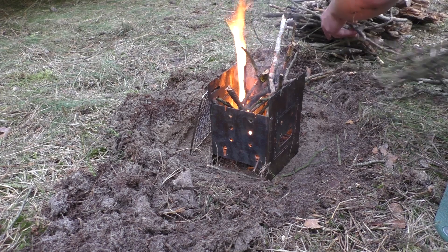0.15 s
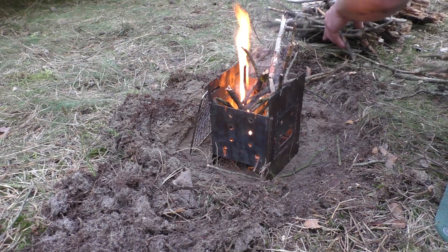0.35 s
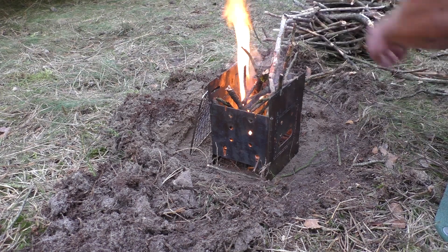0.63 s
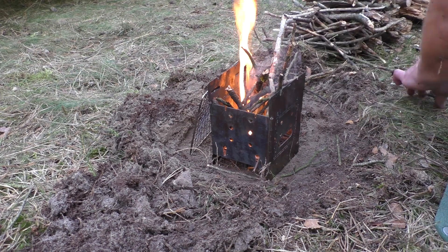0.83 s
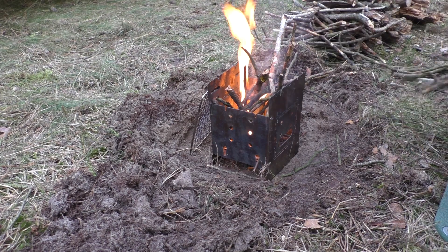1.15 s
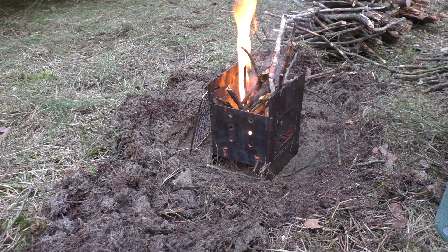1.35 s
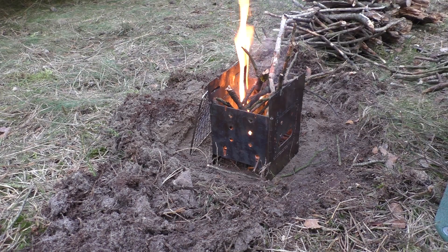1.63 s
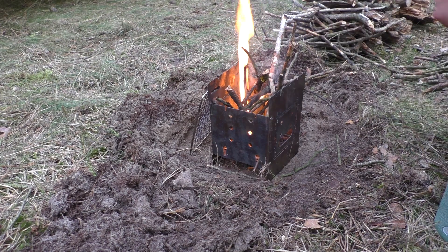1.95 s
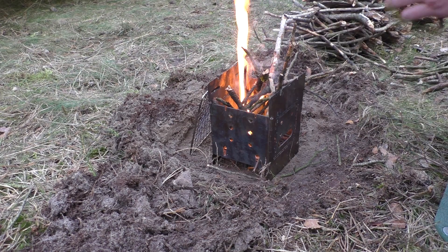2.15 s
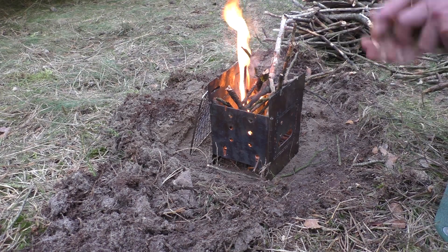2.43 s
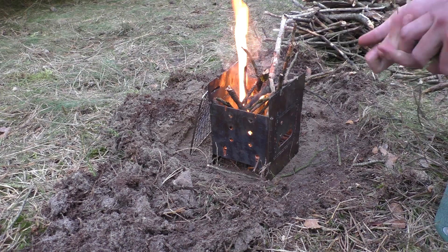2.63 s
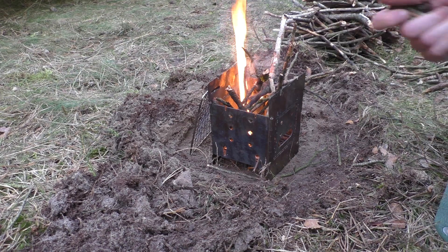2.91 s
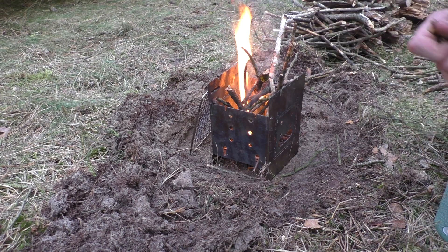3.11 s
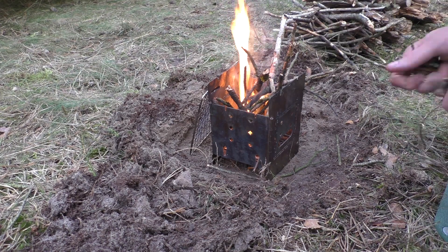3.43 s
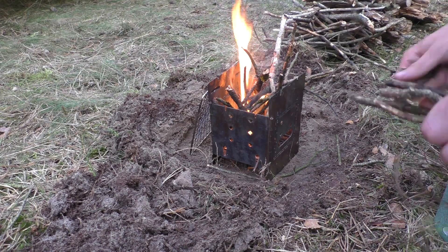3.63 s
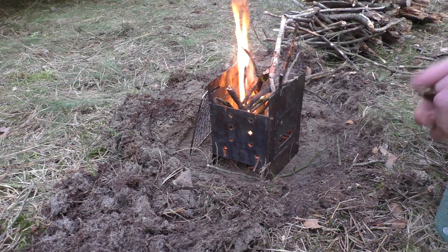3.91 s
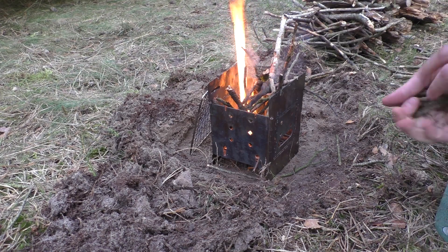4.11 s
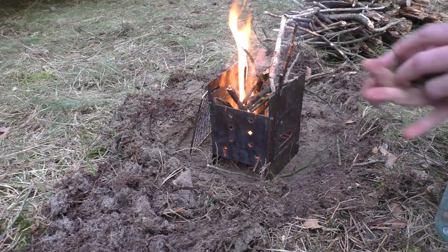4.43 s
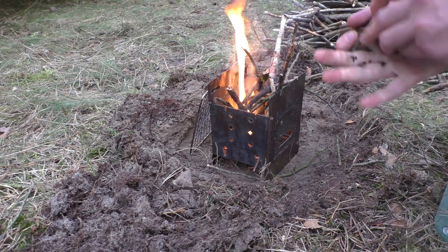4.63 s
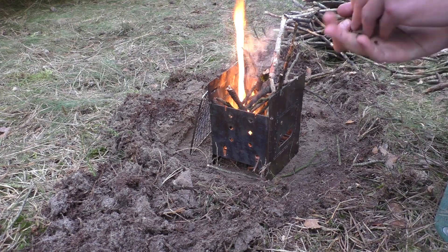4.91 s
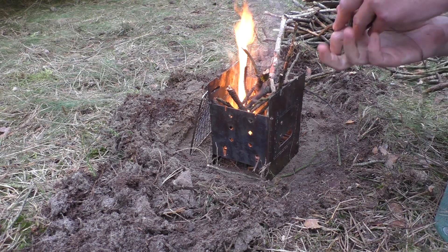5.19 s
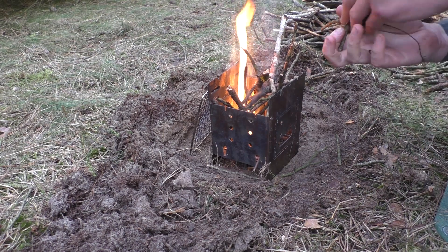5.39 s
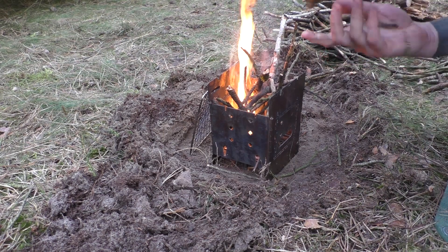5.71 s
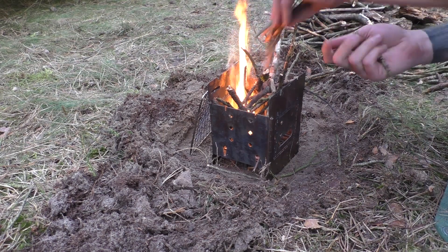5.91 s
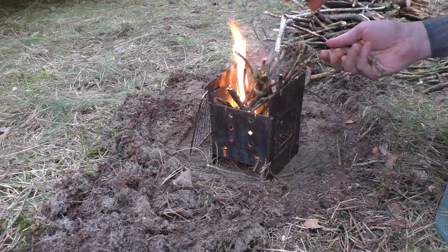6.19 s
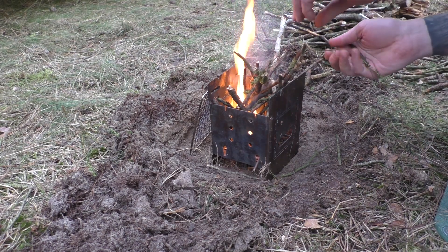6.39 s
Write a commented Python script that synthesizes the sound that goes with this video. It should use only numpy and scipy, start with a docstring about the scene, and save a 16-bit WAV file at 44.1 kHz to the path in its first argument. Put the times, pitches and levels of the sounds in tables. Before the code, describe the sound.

Close by in the open air, hands pull dry twigs from a pile, bark rasping and sticks ticking together over the faint flutter and tiny pops of a small wood fire. Twigs snap sharply, a couple first and then a quick, loud run. More rummaging follows, with one thin metallic ping. At the end the flame swells slightly and sticks knock against the ringing walls of a steel stove.

```python
"""Over open air and the low flutter of a small steel wood stove, hands pull dry twigs from a pile:
bark rasps as it sticks and slips, sticks tick together, and weight shifts softly on the soil.
From two seconds in, twigs snap close by; the loudest cracks push down the gain, which creeps back.
More rummaging follows, then one thin metallic ping. Near six seconds the flame swells
and the last sticks knock against the stove's ringing walls."""
import sys
import numpy as np
from scipy import signal
from scipy.io import wavfile
from scipy.ndimage import uniform_filter1d

SR = 44100
rng = np.random.default_rng(int(sys.argv[2]) if len(sys.argv) > 2 else 0)


def to_wav(sig):
    """Store sig (one row per channel, or 1-D mono) as 16-bit WAV at the path in sys.argv[1].

    Samples outside -1..1 are clipped; the rate is SR.
    """
    pcm = np.clip(np.atleast_2d(sig), -1, 1) * 32767
    pcm = np.round(pcm).astype(np.int16)
    wavfile.write(sys.argv[1], SR, pcm.T)  # frames by channels


N = 288844
TIME = np.arange(N) / SR
CUTOFF_HZ = 15800
# The dull, rasp and hiss zones of wood noise. Each row: low edge in Hz, high edge in Hz.
WOOD_ZONES = [(400, 1500), (1500, 6000), (6000, 17000)]


def from_db(db):
    """Decibels to gain."""
    return 10 ** (np.asarray(db) / 20)


def rms_one(x):
    """Scale to an rms of 1."""
    return x / np.sqrt(np.mean(x ** 2) + 1e-20)


def automation(rows):
    """Join breakpoints into one curve for each column after the time."""
    s, *columns = np.transpose(rows)
    return [np.interp(TIME, s, c) for c in columns]


def fade(t, t60):
    """A decay that loses 60 dB in t60 seconds."""
    return np.exp(-np.log(1000) * t / max(t60, 1e-4))


def band(x, edges_hz, kind="band", order=2):
    """Butterworth filter."""
    sos = signal.butter(order, np.clip(edges_hz, 10, .45 * SR), kind, fs=SR, output="sos")
    return signal.sosfilt(sos, x + 1e-18)


def resonate(x, hz, width_hz, db):
    """Bell EQ: lift or lower one resonance."""
    r = np.exp(-np.pi * width_hz / SR)
    feedback = [1, -(1 + r * r) * np.cos(2 * np.pi * hz / SR), r * r]
    peak = signal.lfilter(np.array([1, 0, -1]) * (1 - r * r) / 2, feedback, x)
    return x + (from_db(db) - 1) * peak


def drift(rate_hz):
    """A smooth random wobble with an rms of 1."""
    hop, run_in = 40, 2000
    r = np.exp(-2 * np.pi * hop * rate_hz / SR)
    slow = signal.lfilter([1], [1, -2 * r, r * r], rng.standard_normal(N // hop + run_in + 2))[run_in:]
    return np.interp(np.arange(N) / hop, np.arange(len(slow)), rms_one(slow))


def add(out, s, sound):
    """Mix a sound in at s seconds."""
    at = max(round(s * SR), 0)
    out[at:at + len(sound)] += sound[:max(N - at, 0)]


def turbulence(spectrum, flicker_db, rate_hz):
    """Noise in half-octave bands that each flicker on their own; rms 1."""
    out, edges = 0, 18 * 2 ** np.arange(0, 10.1, .5)
    white = rng.standard_normal((2, N))
    hz, db = np.transpose(spectrum)
    for k, (low, high) in enumerate(zip(edges, edges[1:])):
        level_db = np.interp(np.log(low * high) / 2, np.log(hz), db)
        out = out + band(white[k % 2], [low, high]) * from_db(level_db + flicker_db * drift(rate_hz))
    return rms_one(out)


def open_air(level_db=-55):
    """A faint bed of moving air: low rumble under a thin hiss."""
    # Each row: frequency in Hz, relative noise density in dB.
    air_spectrum = [(22, -1.5), (45, 2), (80, -1.5), (200, -14), (450, -19.5), (900, -19), (1600, -27.5),
                    (3000, -24.5), (6000, -34.5), (10000, -29.5), (16000, -32)]
    return from_db(level_db) * turbulence(air_spectrum, flicker_db=1.9, rate_hz=4.9)


def fire(flutter_db=0.85, pops_per_s=22, pop_db=-61, pop_t60=0.0042):
    """The flame flutters in the bass, strongest around one low pitch, while sap pops faintly."""
    # The draught, stronger as the wood catches. Each row: time in seconds, level in dB.
    draught = [(0, -55.5), (.8, -59), (1.2, -53.5), (1.7, -54.5), (2.0, -57), (2.7, -57), (3.3, -55),
               (4.1, -54.5), (4.8, -55.5), (5.6, -52), (6.1, -49.5), (6.55, -55)]
    # The flame's tone. Each row: frequency in Hz, relative noise density in dB.
    flame_spectrum = [(40, -9.5), (70, 2.5), (105, -1.5), (150, 4.5), (200, -7.5), (300, -12), (450, -18.5),
                      (900, -33), (2000, -72)]
    level_db = automation(draught)[0] + flutter_db * drift(6.5)
    roar = turbulence(flame_spectrum, flicker_db=2.0, rate_hz=19.6)
    flame = from_db(level_db) * resonate(roar, hz=153, width_hz=14.2, db=5)
    onsets = rng.random(N) < pops_per_s / SR
    sizes = from_db(5.7 * np.minimum(rng.exponential(1, N), 3))
    envelope = signal.lfilter([1], [1, -fade(1 / SR, pop_t60)], onsets * sizes + 1e-18)
    return flame + from_db(pop_db) * band(envelope * rng.standard_normal(N), [1800, 12000], order=1)


def hand_strokes(attack_s=.016, release_t60=0.16):
    """Each stroke grips, swells or eases, and lets go; gives zone levels and the spread of slip sizes."""
    # Each row: start in seconds, length in seconds, mid-stroke rasp level in dB, swell in dB,
    # dull and hiss levels in dB against the rasp, spread of slip sizes in dB.
    stroke_cues = [(0.0, 0.06, -45.5, -8.5, -7.5, -2, 3), (0.08, 0.097, -52, 4.5, -6.5, 2, 3),
                   (0.215, 0.094, -54.5, -2, -5, 0.5, 4.5), (0.392, 0.086, -59.5, 6, -7, -2.5, 3.5),
                   (0.483, 0.16, -50.5, -3, -7, -6, 4), (0.822, 0.066, -61, 0, -4, -0.5, -2),
                   (1.192, 0.056, -50, 6, -1.5, -2.5, 6), (1.33, 0.042, -59.5, 3, -1.5, -8, 1.5),
                   (1.542, 0.16, -59, 13.5, -14, -4.5, 0.5), (2.061, .03, -49, 1, 1, -6, 11),
                   (2.14, 0.16, -70.5, 2, 3, 6, 5), (2.412, 0.02, -45.5, 0, -15, -9, -1.5),
                   (2.466, 0.021, -50.5, 4.5, -11, -3, 6), (2.522, .08, -63, 1, -7, -1, 4),
                   (2.604, 0.16, -61.5, -11, -6, 0.5, 4), (2.804, 0.19, -57, -7, -9.5, 2, 4),
                   (3.06, 0.078, -49.5, 0, -30, 3.5, 7), (3.19, .03, -54, 4, -14, -1, 3.5),
                   (3.245, 0.17, -45, -1, -5, -1.5, 2), (3.362, 0.21, -47.5, 0.5, -5, 4.5, 2),
                   (3.723, 0.19, -60.5, 6.5, 3, -2, 5), (3.91, 0.16, -49.5, 1, -5, 1, 6),
                   (4.09, 0.073, -57, -6, -4, -3, 5.5), (4.17, 0.11, -68.5, 8, 1, 8, 6.5),
                   (4.28, 0.091, -55.5, 9.5, -10, 1.5, 2.5), (4.459, 0.15, -57, -0.5, -5.5, 0.5, 2.5),
                   (4.618, 0.16, -63, 0.5, -4.5, 2, 3.5), (4.834, 0.05, -59, -3, -9, 1.5, -4),
                   (4.98, .05, -63, -1, -6, -3, -2), (5.086, 0.071, -63, 7, -8, 0, 2),
                   (5.237, .11, -66.5, -3, -3, 0, 0), (6.021, 0.17, -55.5, 1, -1.5, -2, 2.5),
                   (6.07, 0.02, -48.5, 0.5, -3, 3.5, 5.5)]
    idle_db = (-71.5, -71.5, -70)   # dull, rasp and hiss of twigs shifting in the grip between strokes
    power = np.outer(from_db(idle_db) ** 2, np.ones(N))
    weighted_spread = np.zeros(N)
    for s, length, db, swell_db, dull_db, hiss_db, spread_db in stroke_cues:
        t = TIME[:int((length + release_t60) * SR)]
        pressure = from_db(db + swell_db * (np.minimum(t / length, 1) - .5))
        envelope = pressure * np.minimum(t / attack_s, 1) * fade(np.maximum(t - length, 0), release_t60)
        for zone, colour_db in zip(power, (dull_db, 0, hiss_db)):
            add(zone, s, (from_db(colour_db) * envelope) ** 2)
        add(weighted_spread, s, spread_db * envelope ** 2)
    return np.sqrt(power), weighted_spread / power[1]


def ground_echo(x):
    """The bounce off the ground shifts with the hands' height; soil and grass swallow its treble."""
    # Each row: time in seconds, delay in milliseconds, echo gain.
    echo_path = [(0, 0.33, 0.31), (2.0, 0.67, 0.089), (3.2, 1.1, 0.11), (3.35, 0.65, 0.46),
                 (3.45, 1.2, 0.15), (3.6, 2.03, 0.49), (3.8, 1.73, 0.7), (4.0, 1.96, 0.32),
                 (4.4, 0.92, 0.12), (6.55, 0.37, 0.091)]
    delay_ms, gain = automation(echo_path)
    echo = np.interp(TIME - delay_ms / 1000, TIME, x)
    return gain * band(echo, 1700, "low", order=1)


def bark_rub(slips_per_s=2600, slip_t60=0.0047, clump_db=2.5, friction=0.4, flicker_db=0.64):
    """Bark sticks and slips in clumps of tiny cracks over a smooth friction noise."""
    levels, spread_db = hand_strokes()
    sizes = from_db(spread_db * np.minimum(rng.exponential(1, N), 4) + clump_db * drift(55))
    slips = (rng.random(N) < slips_per_s / SR) * sizes ** 2
    power = signal.lfilter([1], [1, -fade(1 / SR, slip_t60) ** 2], slips) + 1e-9
    grain = np.sqrt(power / uniform_filter1d(power, size=2200) + friction ** 2) / np.hypot(1, friction)
    grain = grain * from_db(1.3 * drift(12))   # the grip is never quite even
    rub = 0
    for edges, level in zip(WOOD_ZONES, levels):
        flicker = from_db(flicker_db * drift(37))
        rub = rub + level * flicker * rms_one(band(grain * rng.standard_normal(N), edges, order=3))
    for hz in np.geomspace(1500, 9000, num=14):   # twigs of many sizes touch and part
        rub = resonate(rub, hz, width_hz=300, db=3 * drift(14.5))
    rub = resonate(rub, hz=530, width_hz=160, db=2.5)   # the hollow of the hand
    rub = resonate(rub, hz=2650, width_hz=880, db=2.0)   # thin dry wood rings
    rub = resonate(rub, hz=7200, width_hz=400, db=2.5)   # bark hisses on skin
    rub = rub + (from_db(-2.5) - 1) * band(rub, 3500, "high", order=1)   # soft bark dulls the treble
    return rub + ground_echo(rub)


def stick_ticks(trim_db=-0.5, contact_t60=0.003, ring_db=-6, ring_t60=0.025, dull_stretch=1.17):
    """Each light contact is a sharp click with a short ring, coloured by the size of the stick."""
    # Each row: start in seconds, level in dB, stick pitch in Hz, dull level in dB against the rasp.
    tick_cues = [(0.03, -39, 4840, -5), (0.0951, -37, 4160, -9), (0.2366, -40.5, 7750, -8),
                 (0.2882, -37.5, 3600, -5), (0.3144, -38, 7000, -16), (0.5104, -41, 2200, -5),
                 (0.5405, -37, 3030, -13), (0.5885, -32.5, 1950, 0.5), (0.617, -34.5, 2370, -11),
                 (1.2047, -42, 2440, -4), (1.2242, -32.5, 2700, 1), (1.2502, -32, 1790, -9),
                 (1.2817, -40.5, 1760, 3), (1.3619, -39.5, 2410, -6), (1.6885, -43, 2950, -6),
                 (2.256, -41, 2840, -2), (2.3063, -35, 3370, -18), (2.4269, -37, 2850, -20),
                 (2.4846, -38.5, 2300, -8), (2.6655, -36, 2370, -21), (2.7897, -39.5, 8000, -17),
                 (3.069, -38, 5000, -19), (3.2224, -32, 4200, -14), (3.3402, -28, 2210, -17),
                 (3.593, -28.5, 2980, -28), (3.6446, -33.5, 7600, -4), (3.6858, -29, 1500, 6),
                 (3.6924, -27.5, 1880, 6.5), (3.914, -33.5, 3600, -18), (3.995, -33.5, 4300, -1),
                 (4.1104, -38, 2220, -9), (4.135, -33, 1800, 3), (4.1449, -37.5, 7890, -11),
                 (4.1722, -34, 2300, 1.5), (4.2494, -31.5, 4200, 0), (4.341, -35, 8200, -1),
                 (4.8195, -43, 4550, -15), (4.9843, -46.5, 3520, -3), (5.239, -45, 6040, -7),
                 (5.269, -46, 4570, -16), (5.3769, -40.5, 4200, -14), (5.4165, -40.5, 6460, -5),
                 (5.6695, -47.5, 3000, -3), (5.984, -34, 6200, -4), (6.0273, -34.5, 4000, 6),
                 (6.074, -32, 3800, 0.5), (6.1461, -29.5, 5600, -9), (6.1574, -26, 3780, -13),
                 (6.229, -40, 3040, -12), (6.366, -38, 2210, 2.5), (6.3979, -40.5, 3500, 9)]
    out, t = np.zeros(N), TIME[:SR // 10]
    for s, db, stick_hz, dull_db in tick_cues:
        white = rng.choice([-1., 1.], (3, len(t)))
        hiss_db = -4.5 + 6.5 * np.log2(stick_hz / 3000)   # thinner sticks tick higher and brighter
        gains = from_db([dull_db, 0, hiss_db])
        gains = gains / np.linalg.norm(gains)
        burst = 0
        for gain, fibres, edges, stretch in zip(gains, white, WOOD_ZONES, (dull_stretch, 1, 1)):
            envelope = fade(t, contact_t60) + from_db(ring_db) * fade(t, ring_t60 * stretch)
            burst = burst + gain * envelope.std() * rms_one(band(fibres * envelope, edges, order=3))
        coloured = resonate(burst, stick_hz, width_hz=1100, db=7)
        tick = rms_one(coloured) * burst.std()   # the colour adds no energy
        add(out, s, from_db(db + trim_db) * tick)
    return out


def soil_thumps(swell_s=0.0083, body_hz=(70, 330)):
    """Feet and hands shift their weight on soft soil: a short dull swell."""
    # Each row: start in seconds, level in dB.
    thump_cues = [(0.325, -52), (1.235, -42), (1.264, -50), (1.402, -49), (2.105, -50), (2.272, -44),
                  (2.548, -50.5), (4.425, -50), (4.95, -51), (5.152, -48.5)]
    out, t = np.zeros(N), TIME[:SR // 5]
    envelope = t / swell_s * np.exp(1 - t / swell_s)
    for s, db in thump_cues:
        soil = rms_one(band(rng.standard_normal(len(t)), body_hz))
        add(out, s, from_db(db) * soil * envelope)
    return out


def twig_snaps(crack_t60=0.0048, ring_db=-8, tail_t60=0.25, mode_q=6.9, second_mode_ratio=3.02):
    """The wood parts within milliseconds, the halves ring briefly and splinters trail off."""
    # Each row: start in seconds, level in dB, low cut in Hz, thud in dB, first bending mode in Hz,
    # its boost in dB, treble lift in dB, ring t60 in seconds, splinter tail in dB.
    snap_cues = [(0.576, -26, 1900, -2, 3500, 33, -14, 0.0095, -40),
                 (2.0410, -8.5, 660, -5.5, 3000, 0, -3.5, 0.021, -27.5),
                 (2.106, -24, 1200, -5, 3330, 12, -8, 0.013, -29),
                 (2.1086, -23, 1200, -4, 2630, 15, -7, 0.014, -32),
                 (2.3261, -9, 1390, -11.5, 3040, 11.5, 0.5, 0.014, -29),
                 (2.9765, -28, 1300, 6, 5000, 10, -0.5, .016, -36),
                 (3.0157, -11, 1480, -17, 2330, 17.5, -3, 0.007, -36),
                 (3.0202, -6.5, 1600, -23, 2560, 16.5, -1.5, 0.0094, -44.5),
                 (3.0989, -4, 1880, -21, 3470, 10.5, -8.5, 0.011, -46),
                 (3.1355, -9, 2300, -16.5, 4940, 5.5, 0, 0.0073, -36.5),
                 (3.2276, -1, 1400, -1, 4240, 5.5, 7.5, 0.017, -32.5)]
    out, t = np.zeros(N), TIME[:SR // 6]
    for s, db, low_cut_hz, thud_db, bend_hz, bend_db, treble_db, ring_t60, tail_db in snap_cues:
        ring = from_db(ring_db) * fade(t, ring_t60)
        splinters = from_db(tail_db) * fade(t, tail_t60)
        force = rng.choice([-1., 1.], len(t)) * (fade(t, crack_t60) + ring + splinters)
        force[0] *= from_db(11)   # the first fibre gives way hardest
        crack = band(force, low_cut_hz, "high", order=6)   # thin pieces radiate no bass
        thud = from_db(thud_db) * band(force, [150, max(0.81 * low_cut_hz, 300)])
        snap = resonate(crack + thud, hz=9350, width_hz=20000, db=treble_db)
        for mode_hz, boost_db in ((bend_hz, bend_db), (second_mode_ratio * bend_hz, 5.5)):
            snap = resonate(snap, mode_hz, mode_hz / mode_q, boost_db)
        snap = band(snap, CUTOFF_HZ, "low", order=6)
        punch = np.sqrt(np.sum(snap ** 2) / (SR / 1000))   # rms with all the energy in one millisecond
        add(out, s, from_db(db) * snap / punch)
    return out


def metal_modes(modes):
    """One second of struck metal: a decaying sine for each mode, in alternating polarity."""
    t = TIME[:SR]
    return np.array([from_db(db) * np.sin(2 * np.pi * hz * t) * fade(t, t60) * (-1) ** k
                     for k, (hz, db, t60) in enumerate(modes)])


def metal_ping(start_s=4.570, level_db=-49.5):
    """Thin metal pings once; its bright top dies first and the lower modes hang on."""
    # Each row: pitch in Hz, level in dB, t60 in seconds.
    ping_modes = [(1125, -11, 1.3), (2697, -16, 1.2), (3660, -16, 1.1), (4850, -14, 1.5), (6100, -16, .4),
                  (6492, -7, 0.3), (7150, 0, 0.19), (7600, 3, 0.17), (8300, 1, 0.13)]
    out = np.zeros(N)
    add(out, start_s, from_db(level_db) * metal_modes(ping_modes).sum(axis=0))
    return out


def stove_knocks(focus_octaves=0.09, spill_db=-17):
    """A stick wakes mostly the wall modes that suit the spot it hits, and the others a little."""
    # The steel walls. Each row: pitch in Hz, level in dB, t60 in seconds.
    wall_modes = [(486, -5.5, 0.18), (625, -2, 0.14), (1242, -2.5, .18), (1424, -8, .15), (1640, -2, 0.12),
                  (2050, 1.5, 0.083), (2240, -6, 0.12), (2257, 5.5, 0.058), (3500, 7.5, 0.06),
                  (3720, -2.5, 0.18), (4540, 3, 0.076), (4883, -10, .12), (6600, -6, .15)]
    # Each row: start in seconds, level in dB, the pitch that the spot favours in Hz.
    knock_cues = [(6.028, -49, 620), (6.158, -35.5, 3900), (6.229, -37.5, 1535), (6.247, -42.5, 624),
                  (6.296, -46.5, 2272), (6.368, -47.5, 2100), (6.396, -43.5, 3230), (6.4, -36, 485)]
    out = np.zeros(N)
    rings, mode_hz = metal_modes(wall_modes), np.array(wall_modes)[:, 0]
    for s, db, spot_hz in knock_cues:
        favoured = np.exp(-(np.log2(mode_hz / spot_hz) / focus_octaves) ** 2)
        spill = from_db(spill_db) * rng.standard_normal(len(wall_modes))
        add(out, s, from_db(db) * (favoured + spill) @ rings)
    return out


def scene():
    """Everything is close and in the open, alike in both channels."""
    handling = bark_rub() + twig_snaps() + stick_ticks() + soil_thumps()
    mono = handling + metal_ping() + stove_knocks() + fire() + open_air()
    return np.array([mono, mono])


def gain_control(x, threshold_db=-13, release_db_per_s=17, attack_s=0.0035):
    """Duck fast when the level passes the threshold, then creep back up."""
    level_db = 10 * np.log10(np.maximum(uniform_filter1d(x[0] ** 2, size=66), 1e-12))
    over_db = np.maximum(level_db - threshold_db, 0)
    held_db = np.maximum.accumulate(over_db + release_db_per_s * TIME) - release_db_per_s * TIME
    r = np.exp(-1 / (attack_s * SR))
    return x * from_db(-signal.lfilter([1 - r], [1, -r], held_db))


def record(dry):
    """The microphone port colours the treble; gain control, soft clipping and a steep high cut follow."""
    x = resonate(dry, hz=8300, width_hz=1230, db=4.0)
    x = resonate(x, hz=10900, width_hz=4300, db=-3.5)
    x = resonate(x, hz=13800, width_hz=1700, db=-3.0)
    x = 1.3 * np.tanh(gain_control(x) / 1.3)
    return signal.sosfilt(signal.ellip(10, .2, 80, CUTOFF_HZ, fs=SR, output="sos"), x)


dry = scene()
out = record(dry)
to_wav(out)
```